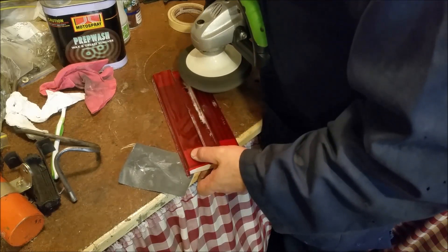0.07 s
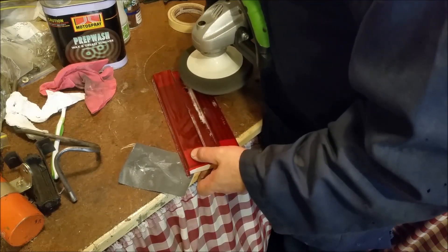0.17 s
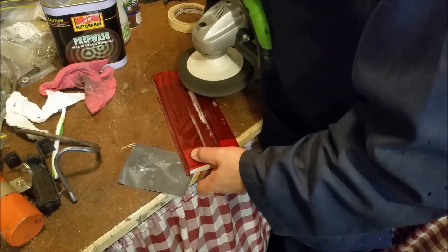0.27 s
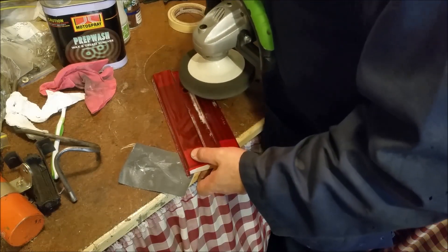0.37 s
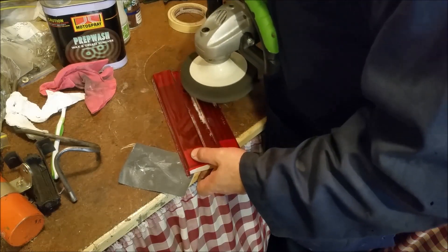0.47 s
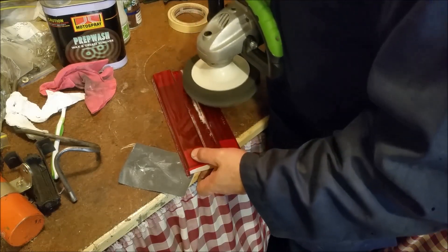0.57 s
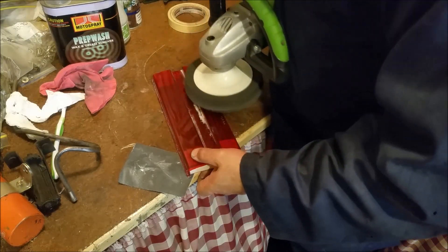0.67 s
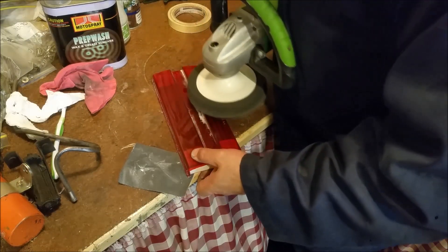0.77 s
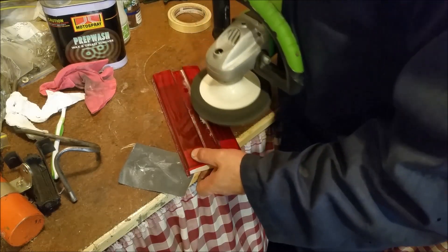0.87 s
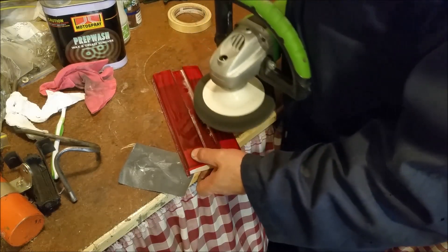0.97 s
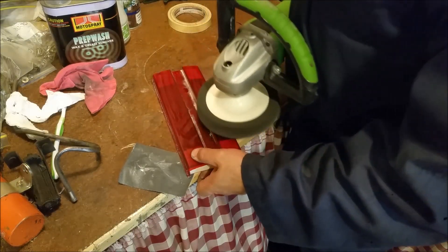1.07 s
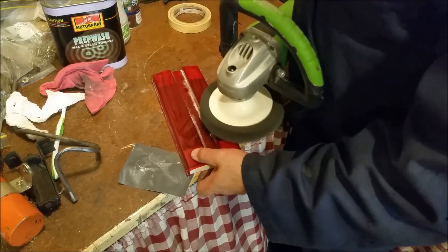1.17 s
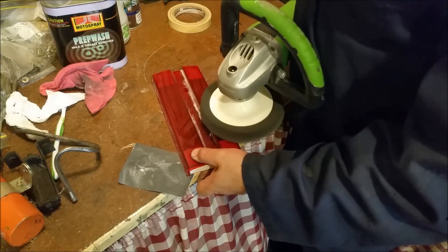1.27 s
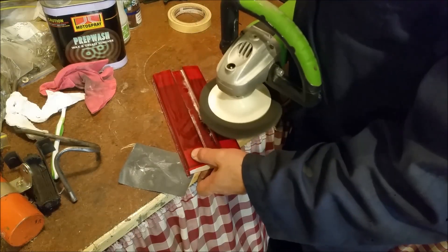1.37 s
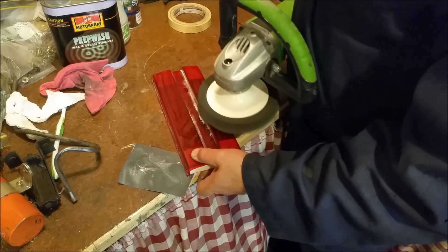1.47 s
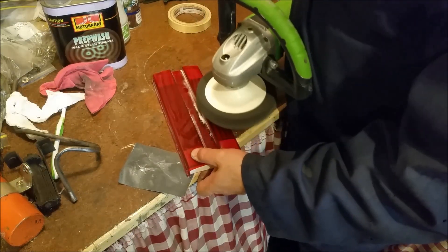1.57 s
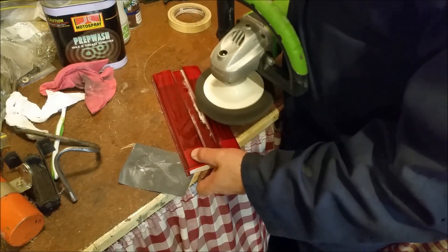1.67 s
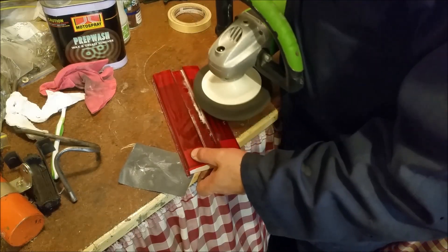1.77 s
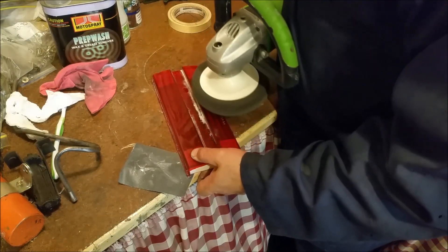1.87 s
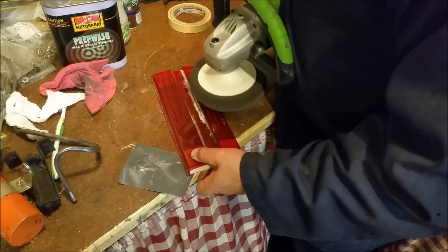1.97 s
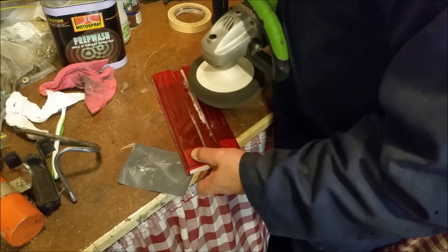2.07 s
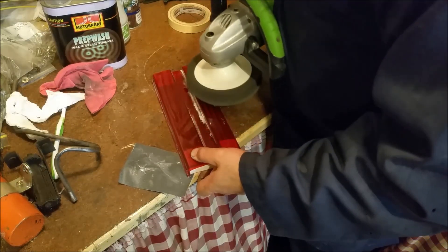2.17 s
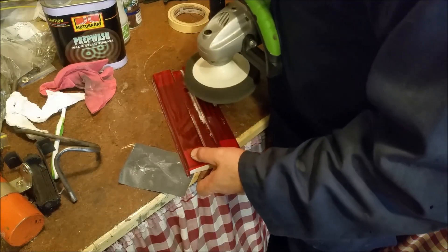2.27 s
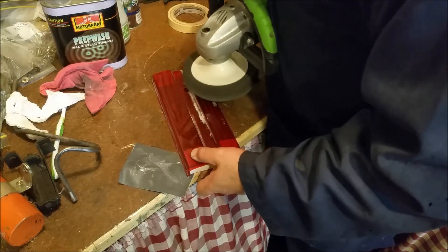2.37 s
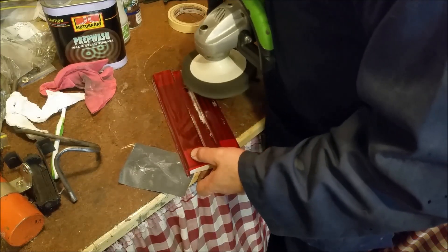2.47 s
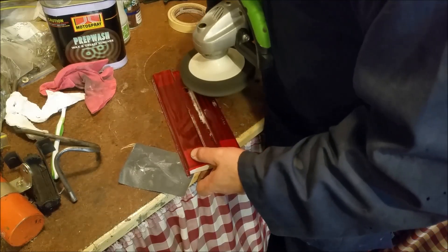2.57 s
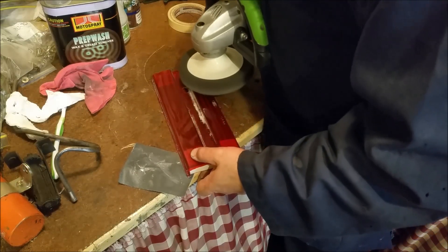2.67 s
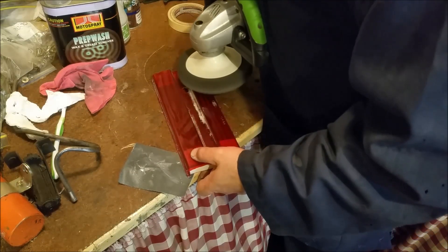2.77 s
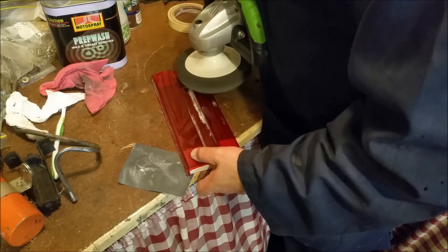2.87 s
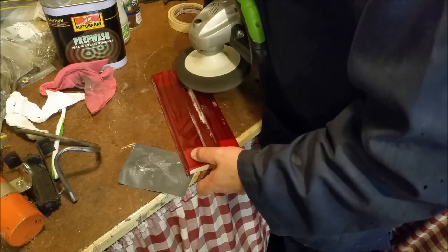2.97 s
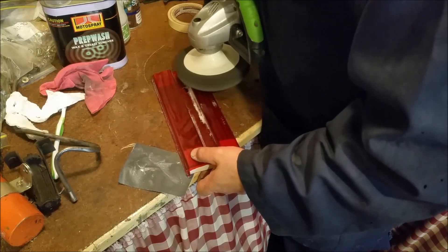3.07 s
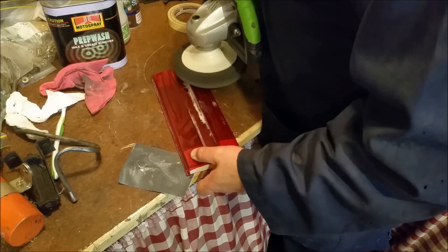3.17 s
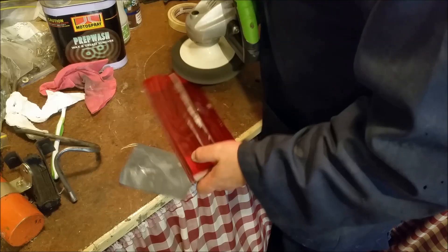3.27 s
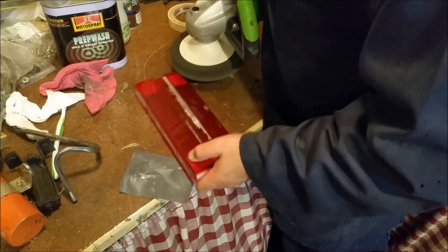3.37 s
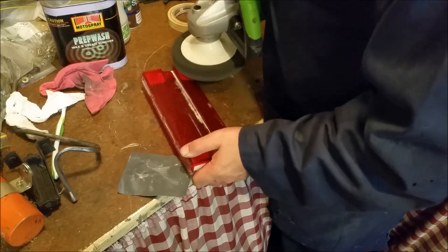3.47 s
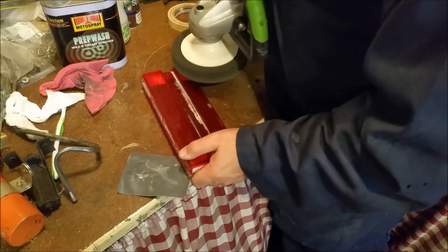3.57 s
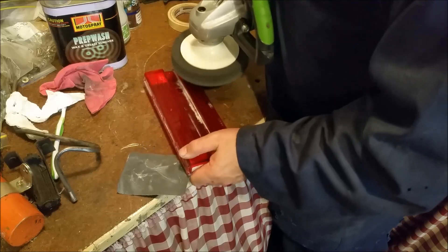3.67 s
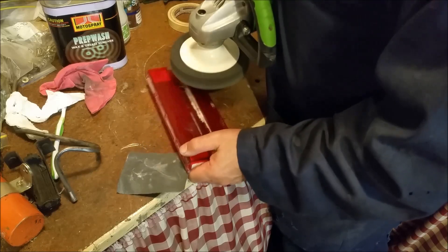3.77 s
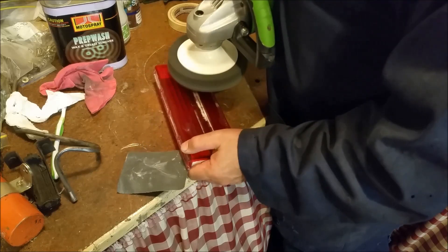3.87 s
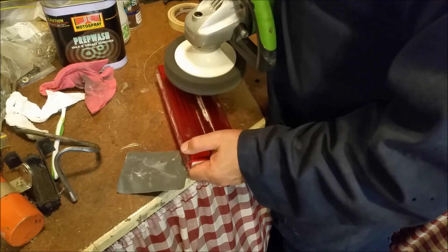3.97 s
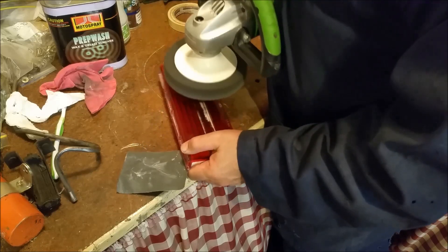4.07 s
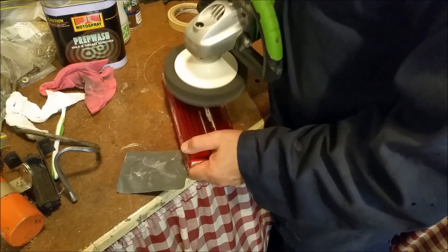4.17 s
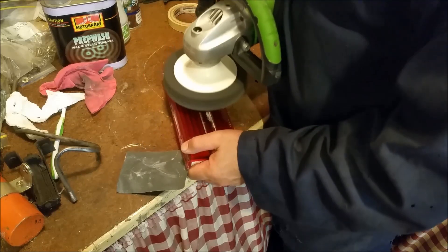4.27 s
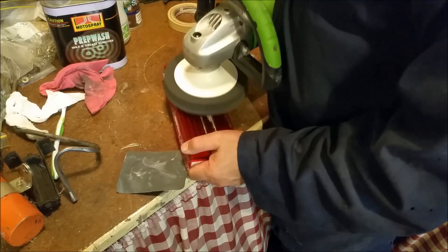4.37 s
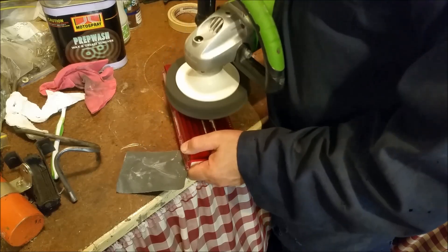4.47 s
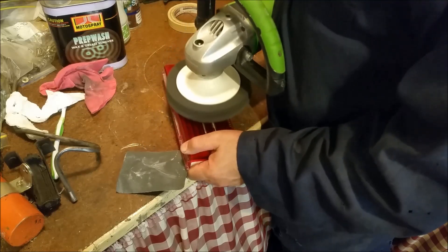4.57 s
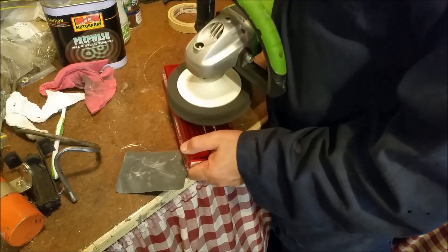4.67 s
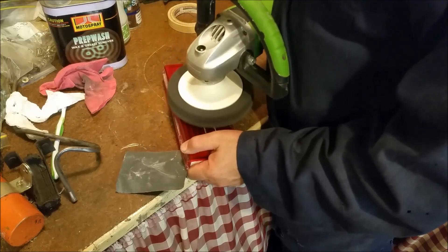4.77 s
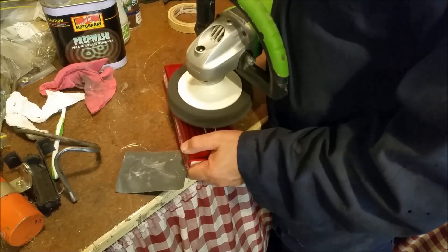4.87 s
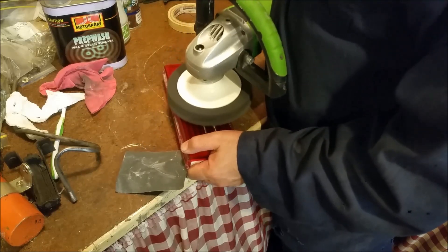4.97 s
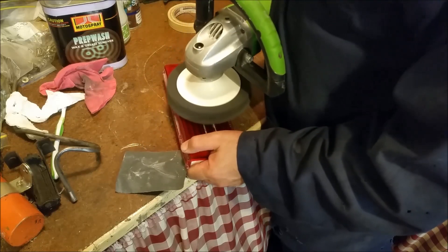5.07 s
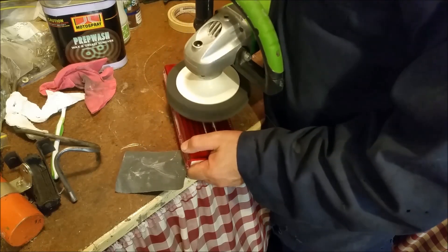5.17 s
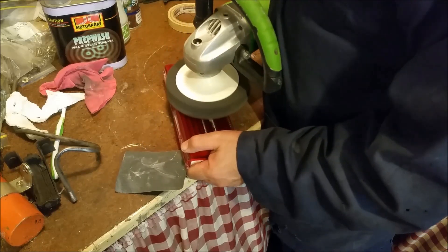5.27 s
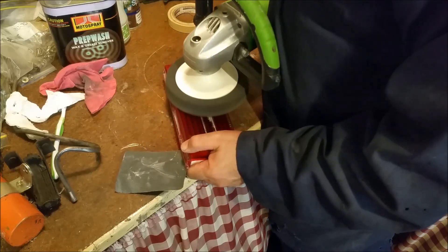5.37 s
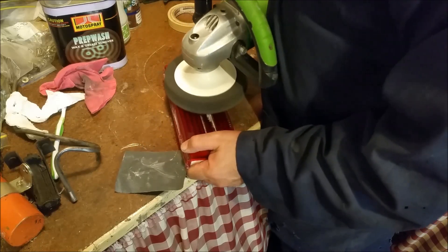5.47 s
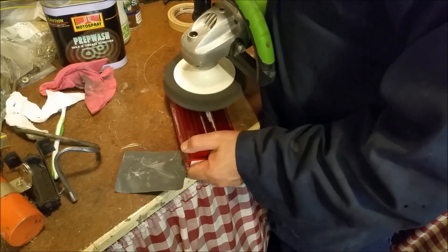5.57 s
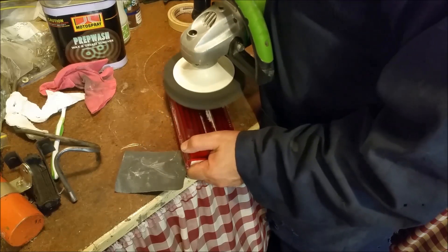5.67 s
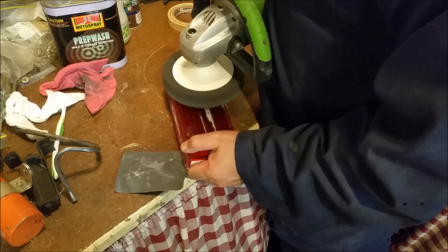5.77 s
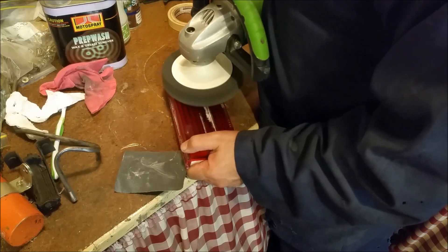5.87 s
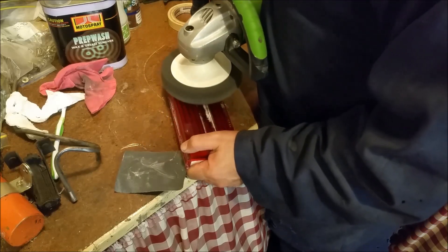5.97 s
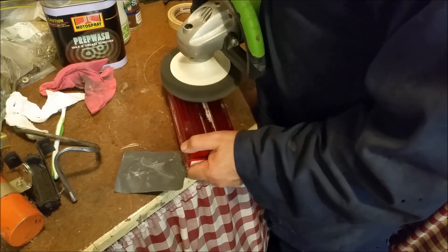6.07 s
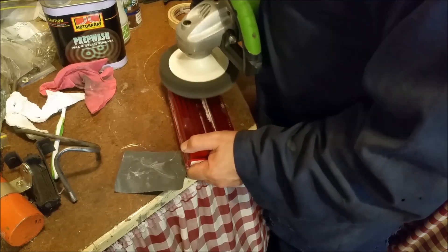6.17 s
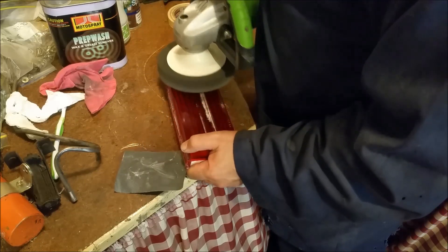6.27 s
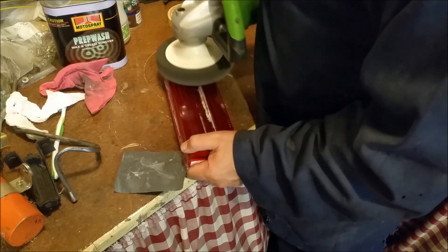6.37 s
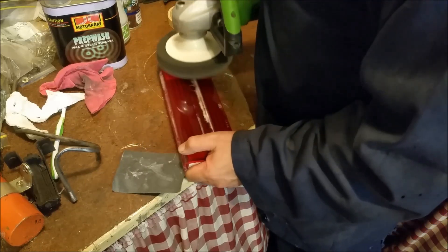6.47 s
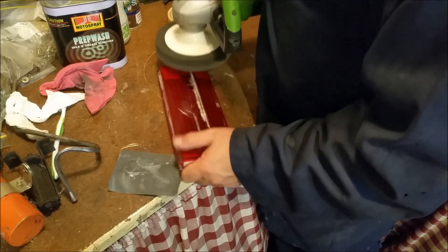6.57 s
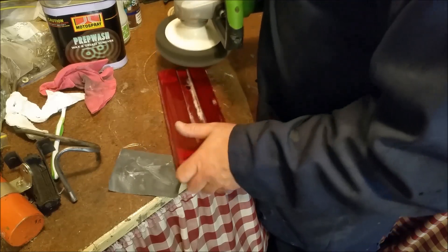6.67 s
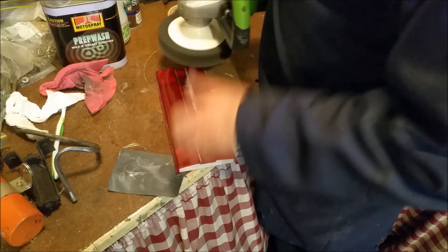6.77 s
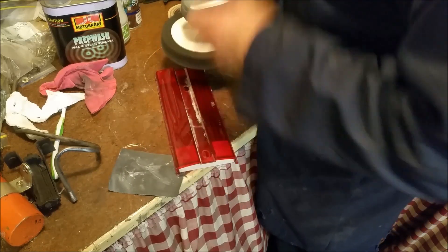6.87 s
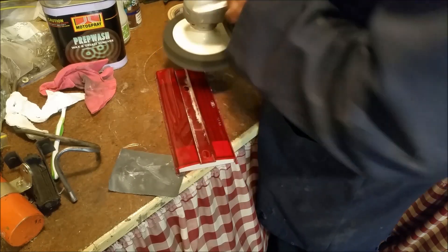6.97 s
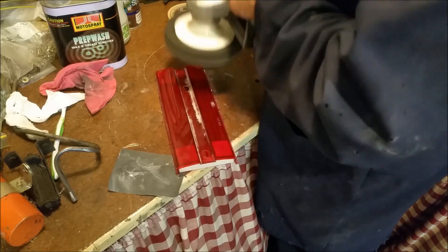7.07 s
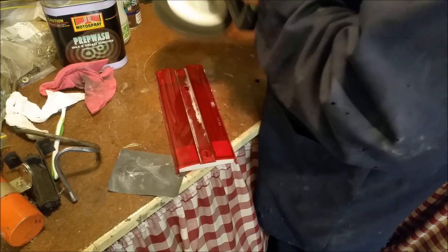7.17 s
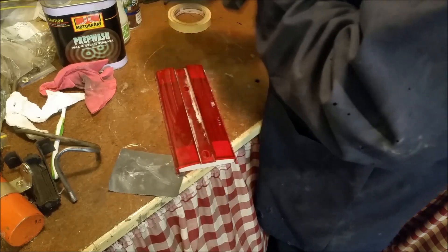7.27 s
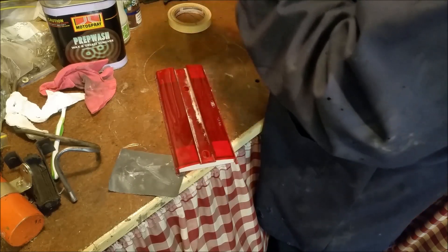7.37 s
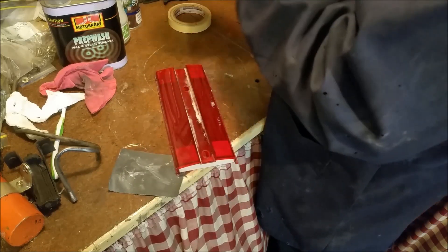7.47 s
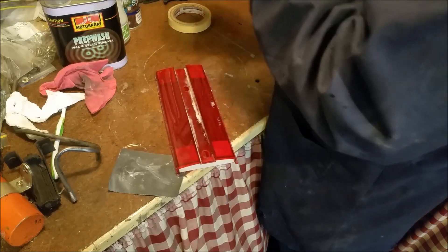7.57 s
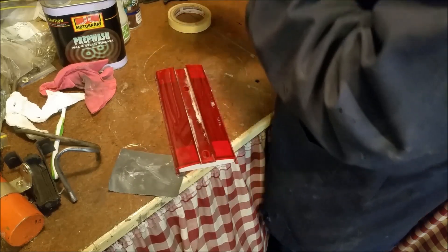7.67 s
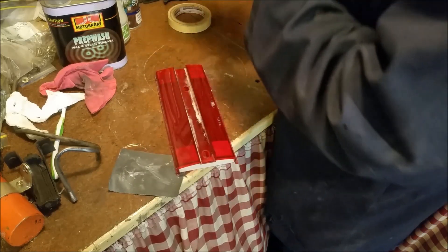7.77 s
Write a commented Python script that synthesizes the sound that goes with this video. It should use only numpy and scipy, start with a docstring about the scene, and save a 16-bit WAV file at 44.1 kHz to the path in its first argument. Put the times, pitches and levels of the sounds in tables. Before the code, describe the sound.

Close, throbbing motor whine with gear grind and pad rubbing, rising when lifted, sagging under load, ending in plastic knocks and a falling spin-down.

```python
"""A hand-held electric polisher presses on a ribbed plastic lens on a garage bench, heard close by in stereo.
From the start the armature slots whine in mains-rate throbs, gears grind, the pad rubs and the fan hisses.
At 3.4 s the pad lifts and the motor speeds up; at 4.45 s it lands again, and it lifts once more at 6.6 s.
From 6.73 s the released lens clatters on the bench; at 6.8 s the power goes off and the tool coasts, its gears ticking.
Tones follow the summed turns of the armature; rubbing, grinding, air and garage are noise shaped by spectra."""
import sys
import numpy as np
from scipy import signal
from scipy.fft import rfft, irfft, next_fast_len
from scipy.io import wavfile
from scipy.ndimage import uniform_filter1d

SR = 44100
rng = np.random.default_rng(int(sys.argv[2]) if len(sys.argv) > 2 else 0)


def wav_out(sig):
    """Save sig, one row per channel (or a flat mono array), as 16-bit PCM at SR to the path in sys.argv[1]."""
    wavfile.write(sys.argv[1], SR, np.round(np.clip(np.atleast_2d(sig).T, -1, 1) * 32767).astype(np.int16))


N = 345303

SLOTS, BARS = 12, 24  # armature slots and commutator bars: cycles per turn
POWER_OFF_S = 6.797
MAINS_HZ, MAINS_PEAK_S = 50, 0.0108


def undb(db):
    """Amplitude factor of a level in dB."""
    return 10 ** (np.asarray(db) / 20)


def shape(points, size):
    """Level in dB on the bins of a transform, interpolated over log frequency between (f/Hz, level/dB) points."""
    hz, db = np.transpose(points)
    bins_hz = np.arange(size // 2 + 1) * SR / size
    return np.interp(np.log(bins_hz + 1), np.log(hz), db)


def colour(x, points):
    """Filter by a spectrum, scaled so that unit white noise keeps rms 1."""
    size = next_fast_len(N)
    gain = undb(shape(points, size))
    gain = gain / np.sqrt(np.mean(gain ** 2))
    return irfft(rfft(x, size) * gain, size)[..., :N]


def ring(x, hz, width_hz):
    """One resonance: a peak filter of the given bandwidth."""
    return signal.lfilter(*signal.iirpeak(hz, hz / width_hz, fs=SR), x)


def ring_twice(x, hz, width_hz):
    """The same resonance passed twice, for steeper skirts."""
    return ring(ring(x, hz, width_hz), hz, width_hz)


def walk(rate):
    """Random levels drawn `rate` times a second and smoothed twice; spread about 0.67."""
    hold = int(SR / rate)
    steps = np.repeat(rng.standard_normal(N // hold + 1), hold)
    return 0.91 * uniform_filter1d(uniform_filter1d(steps, hold), hold)[:N]


def tone(multiple, turns):
    """Sine of rms 1 and random phase, locked to a multiple of the given cycle count."""
    return np.sqrt(2) * np.sin(2 * np.pi * (multiple * turns + rng.random()))


def swells(t, events):
    """Sum of bell-shaped level changes in dB from (centre t/s, spread/s, level/dB) events."""
    return sum(db * np.exp(-.5 * ((t - s) / spread) ** 2) for s, spread, db in events)


def mains_cycles(t):
    """Mains cycles since a peak of the stronger half wave."""
    return MAINS_HZ * (t - MAINS_PEAK_S)


def powered(t):
    """1 while the motor has power, then 0, with a short crossfade."""
    return uniform_filter1d(1. * (t < POWER_OFF_S), SR // 300)


def throb(depth, uneven):
    """The motor current peaks twice a mains cycle, one half stronger, until the switch opens; mean 1."""
    t = np.arange(N) / SR
    mains = 2 * np.pi * mains_cycles(t)
    pull = np.exp(depth * np.cos(2 * mains) + uneven * np.cos(mains))
    return np.where(t < POWER_OFF_S, pull / pull.mean(), 1)


def pressure(t):
    """Pad pressure: each stroke lands smoothly, holds and lifts a little more quickly."""
    # strokes on the lens: lands t/s, leaves t/s, pressure 0-1
    strokes = [(-0.5, 3.42, 0.88), (4.45, 6.6, 0.95)]
    land_s, leave_s = 0.08, 0.048
    total = 0
    for lands, leaves, press in strokes:
        landed = 1 / (1 + np.exp((lands - t) / land_s * 4))
        held = 1 / (1 + np.exp((t - leaves) / leave_s * 4))
        total = total + press * landed * held
    return total


def layer_db(layer, t, hz):
    """Level from load and speed; once the switch opens it drops, then keeps sinking."""
    free_db, load_db, speed_db, off_db, die_s = layer
    coast_db_per_s = -4.5
    off_s = np.maximum(t - POWER_OFF_S, 0)
    running_db = free_db + load_db * pressure(t) + speed_db * np.log2(hz / 200)
    return running_db + off_db * (1 - np.exp(-off_s / die_s)) + coast_db_per_s * off_s


def tone_db(multiple, hz):
    """Case resonances make each tone loud at some speeds and faint at others; it also wavers a little."""
    # speed/turns per s, then the level/dB of each of the multiples below
    case_levels = [(160.4, -35, -33.5, -37, -37, -32.5, -32.5, -32),
                   (161, -39, -31, -35, -37, -29.5, -36, -36.5),
                   (162.7, -35, -29, -30, -35, -29.5, -40, -31),
                   (163.4, -38, -34, -27, -28.5, -31, -51, -33),
                   (165.3, -34.5, -29.5, -30, -29.5, -40, -41, -34.5),
                   (167.3, -36, -33, -33, -30, -45, -43, -32),
                   (168.5, -37, -27, -31.5, -37, -52, -35, -30.5),
                   (170.7, -32, -28, -25.5, -34, -43, -31.5, -29),
                   (171.3, -31, -33, -27, -37.5, -41, -30.5, -27), (178, -36, -36, -42, -45, -48, -43, -27),
                   (186.4, -41, -34, -46, -49, -50, -44, -34),
                   (190.3, -47, -22.5, -33, -37.5, -41, -37, -28.5),
                   (192.6, -46, -25, -40, -39, -38, -45, -30.5),
                   (196.3, -51, -21.5, -37, -33, -44, -46, -29.5),
                   (197.6, -46, -21.5, -33, -40, -39, -41, -34),
                   (199.4, -48, -20, -34, -39, -42, -36, -37.5),
                   (200.8, -42, -20, -37, -36, -36, -42, -29.5), (205.2, -41, -25, -45, -33, -41, -36, -35),
                   (208.4, -32, -26.5, -32, -33, -44, -29, -33), (209, -36, -24.5, -38, -29, -36, -29, -32),
                   (211, -38, -30.5, -41, -28, -39, -26, -36), (213.6, -45, -33, -45, -29, -40, -32, -35.5)]
    # multiples of the turn rate, in the order of those columns
    multiples = (9, 12, 15, 18, 19, 21, 24)
    columns = np.transpose(case_levels)
    return np.interp(hz, columns[0], columns[1 + multiples.index(multiple)]) + 1.1 * walk(6)


def armature_speed(t):
    """Turns per s: set by trigger hand and load, then dying away exponentially without power."""
    # t/s, speed/turns per s
    speed = [(0, 158.9), (0.25, 160.3), (0.5, 163.5), (0.75, 166.9), (1, 169.7), (1.25, 171.3),
             (1.5, 172.1), (1.75, 171.7), (2, 170.4), (2.25, 168.0), (2.5, 165.0), (2.75, 161.9),
             (3, 161.0), (3.2, 161.5), (3.33, 164.1), (3.45, 171.1), (3.6, 181.6), (3.75, 189.8),
             (3.9, 196.7), (4.1, 204.1), (4.3, 209.5), (4.45, 212.4), (4.6, 213.9), (4.75, 213.4),
             (4.95, 210.5), (5.15, 206.4), (5.35, 202.5), (5.6, 198.5), (5.85, 194.6), (6.1, 191.1),
             (6.3, 189.4), (6.45, 190.3), (6.6, 193.6), (6.7, 197.2), (6.8, 199.4)]
    coast_s, coast_lag_s = 2.4, 0.063  # time constant of the speed loss, and its delay
    driven = uniform_filter1d(np.interp(t, *np.transpose(speed)), SR // 20)
    coasting = np.maximum(t - POWER_OFF_S - coast_lag_s, 0)
    return driven, driven * np.exp(-coasting / coast_s)


def slot_whine(turns, slot_db):
    """Slots sing as the current's pull throbs; an out-of-round armature adds the multiple below, which beats."""
    # side tones of the whine: t/s, then level/dB at each of the offsets below
    side_levels = [(0.0, -52, -52, -54, -35, -39, -38), (0.4, -57, -46, -52, -41, -42, -39),
                   (0.8, -51, -54, -42, -41, -39, -39), (1.2, -35, -48, -41, -38, -37, -39),
                   (1.6, -43, -46, -42, -29, -36, -27), (2.0, -51, -50, -47, -43, -34, -32),
                   (2.4, -53, -48, -39, -33, -38, -35), (2.8, -49, -44, -52, -34, -38, -36),
                   (3.2, -54, -47, -53, -36, -36, -41), (3.5, -60, -45, -38, -39, -36, -34),
                   (3.65, -47, -42, -41, -26, -22, -39), (3.8, -57, -43, -45, -21.5, -37, -43),
                   (3.95, -47, -45, -26, -25, -31, -38), (4.1, -48, -35, -20.5, -27, -39, -51),
                   (4.25, -39, -26, -22, -35, -44, -55), (4.4, -38, -28, -23.5, -31, -44, -48),
                   (4.55, -35, -25, -32, -33, -46, -45), (4.7, -39, -22.5, -37, -40, -43, -50),
                   (4.85, -39, -27, -35, -36, -49, -48), (5.0, -40, -29, -28, -36, -42, -48),
                   (5.15, -47, -26, -24, -36, -41, -49), (5.3, -48, -32, -29, -36, -43, -41),
                   (5.5, -48, -30, -26, -32, -26, -48), (5.7, -55, -40, -28, -25, -37, -37),
                   (5.9, -45, -47, -38, -21, -29, -39), (6.1, -49, -39, -44, -27.5, -33, -35),
                   (6.3, -52, -37, -42, -27, -33, -41), (6.5, -46, -29, -32, -25, -38, -46),
                   (6.7, -50, -40, -35, -27, -40.5, -51)]
    # offsets from the whine, in current peaks (two per mains cycle)
    offsets = (-3, -2, -1, 1, 2, 3)
    uneven, below_db, lag = 0.29, -11, 0.11  # one mains half stronger; side tone lag in cycles per offset
    t = np.arange(N) / SR
    mains, power, start = mains_cycles(t), powered(t), rng.random()
    columns = np.transpose(side_levels)

    def side_tone(offset):
        phase = SLOTS * turns + start + 2 * offset * mains - lag * abs(offset)
        return np.sqrt(2) * np.sin(2 * np.pi * phase)

    sides = 0
    for offset, db in zip(offsets, columns[1:]):
        sides = sides + undb(np.interp(t, columns[0], db) + 2.0 * walk(9)) * side_tone(offset)
    # the multiple below follows the level of the side tone two peaks below
    sides += undb(np.interp(t, columns[0], columns[2]) + below_db) * tone(SLOTS - 1, turns)
    pulse = 1 + uneven * power * np.cos(2 * np.pi * mains)
    return undb(slot_db) * side_tone(0) * pulse + power * sides


def winding_hum():
    """The current hums in the windings at even multiples of the mains while there is power."""
    # multiple of the mains, level/dB
    hum_tones = [(4, -66), (6, -59), (8, -55), (10, -56)]
    t = np.arange(N) / SR
    hum = sum(undb(db + 3.1 * walk(2.5)) * tone(k, mains_cycles(t)) for k, db in hum_tones)
    return powered(t) * hum


def rotor(turns, hz, bars_db, free):
    """Brushes cross the commutator bars; imbalance shakes with speed squared, its overtones also with load."""
    # shake of the housing: multiple of the turn rate, level/dB at 200 turns per s under power and load
    shakes = [(1, -58), (2, -55), (3, -49.5), (4, -48.5)]
    coast_db, free_db = -6.5, -8  # change without power; change of the overtones with the pad off
    force = undb(coast_db * (np.arange(N) > POWER_OFF_S * SR)) * (hz / 200) ** 2
    shake = 0
    for k, db in shakes:
        overtone_db = free_db * free + 4.0 * walk(3.0) if k > 1 else 0
        shake = shake + undb(db + overtone_db) * tone(k, turns)
    return undb(bars_db) * tone(BARS, turns) + force * shake


def gear_mesh(turns, hz, mesh_db, free):
    """Meshing gear teeth sound at fixed multiples of the turn rate, weaker when the pad runs free."""
    # multiples of the turn rate
    mesh_multiples = (9, 15, 18, 19, 21)
    # level change/dB of each multiple with the pad off
    free_levels = [-5, -13, -17, -13, -17]
    return sum(undb(mesh_db + free_db * free + tone_db(k, hz)) * tone(k, turns)
               for k, free_db in zip(mesh_multiples, free_levels))


def gear_grind(turns):
    """Grinding noise plus the pattern that repeats each turn, each tone wavering alone, through the housing."""
    # weaker tones: multiple of the turn rate, level/dB over the grinding noise in 1 Hz
    teeth = [(6, 24), (7, 15), (11, 21), (13, 22.5), (14, 18.5), (16, 18.5), (10, 14), (17, 13), (20, 21.5),
             (22, 14), (23, 18.5), (25, 22.5), (26, 14), (27, 22), (28, 24.5), (29, 23.5), (30, 22),
             (31, 26), (32, 25.5), (33, 7), (34, 14), (36, 16)]
    # housing spectrum: f/Hz, relative level/dB
    housing = [(400, -34.5), (1200, -11.5), (1600, -13), (2050, -6), (2340, 0.5), (2600, -2.5),
               (3050, -6.5), (3370, -10.5), (3900, -9), (4610, -4), (5100, -12), (5850, -24), (8000, -23),
               (10400, -56)]
    lines = sum(undb(db + 3.0 * walk(3.08)) * tone(k, turns) for k, db in teeth)
    grind = undb(0.85 * walk(13)) * throb(0.14, 0.18) * rng.standard_normal(N)
    return colour(grind + lines * np.sqrt(2 / SR), housing)  # the factor refers tones to noise in 1 Hz


def pad_rub(t, pad_db):
    """Low shaped noise of the pad throbs with the current and swells briefly, also as the lens rattles."""
    # brief swells of low noise (pad scuffs; at 6.865 s the lens rattling on the bench):
    # centre t/s, spread/s, level/dB
    low_swells = [(1.003, 0.076, 1), (2.291, 0.031, 0.5), (3.37, 0.12, 3), (6.412, 0.14, 1.5),
                  (6.865, 0.018, 5)]
    # rubbing spectrum: f/Hz, relative level/dB
    pad_spectrum = [(53, -52.5), (90, -29), (175, -15.5), (248, -21.5), (415, -4), (547, -7), (703, -4),
                    (915, -5), (1010, -1), (1270, -4), (1450, 0.5), (1800, -4), (2340, -9), (3960, -120)]
    rub = colour(throb(0.18, 0.083) * rng.standard_normal(N), pad_spectrum)
    return undb(pad_db + swells(t, low_swells) + 1.0 * walk(8)) * rub


def fan(turns):
    """Gusty air, unrelated left and right, with turn-rate multiples that flare at cowl and vent resonances."""
    # multiples that stand out: multiple of the turn rate, level/dB over the air in 1 Hz
    overtones = [(36, 17), (42, 13), (45, 15), (54, 8), (60, 14), (62, 13)]
    # air spectrum: f/Hz, relative level/dB
    air_spectrum = [(1650, -36), (2800, -13), (3500, -4.5), (3860, -0.5), (4210, -3.5), (4550, -3.5),
                    (4860, -3.5), (5980, -18.5), (6560, -13.5), (7570, -22.5), (8550, -15), (11100, -15),
                    (15500, -25)]
    cowl_hz, cowl_width_hz, vent_hz, vent_width_hz = 8900, 1300, 6700, 480
    air = undb(1.1 * walk(4.28) + 2.24 * walk(9)) * rng.standard_normal((2, N))
    lines = sum(undb(11 + 6.0 * walk(6)) * tone(k, turns) for k in range(32, 68))
    lines += sum(undb(db + 6.0 * walk(6.4)) * tone(k, turns) for k, db in overtones)
    # the overtone of the commutator crosses the cowl resonance, lower multiples that of the vent
    lines += ring(undb(22 + 5.0 * walk(10)) * tone(2 * BARS, turns), cowl_hz, cowl_width_hz)
    vent = sum(undb(25 + 3.5 * walk(4)) * tone(k, turns) for k in (30, 31, 32, 33))
    lines += ring_twice(vent, vent_hz, vent_width_hz)
    lines *= undb(1.0 * (np.arange(N) > POWER_OFF_S * SR))  # 1 dB clearer while coasting
    return colour(air + lines * np.sqrt(2 / SR), air_spectrum)


def garage_air():
    """Steady background noise of the garage, mostly common to both channels."""
    # background spectrum: f/Hz, relative level/dB
    garage_spectrum = [(12, -47), (20, -8.5), (92, -37), (141, -13), (216, -42.5), (300, -17), (574, -9),
                       (730, 5), (1200, -4.5), (1560, -27), (2640, -120)]
    mid, side = rng.standard_normal((2, N))
    return undb(-47.5) * colour(mid + 0.25 * side * np.array([[1], [-1]]), garage_spectrum)


def lens_clatter():
    """Each knock is a short rough scrape into the lens modes, strongest near its range; the thin part lacks bass."""
    # knocks on the bench: t/s, level/dB, loudest range f/Hz, scrape length/ms (two decay time constants)
    knocks = [(6.733, -5.5, 1140, 3.3), (6.766, -7, 1030, 2.4), (6.775, -17, 4000, 4),
              (6.79, -14, 1300, 2.4), (6.8093, -11, 1200, 3.2), (6.8112, -0.5, 1400, 5.5),
              (6.8194, -11, 1800, 3), (6.821, -13, 380, 5), (6.849, -10, 875, 4.7), (6.857, -6, 1000, 7.9),
              (6.866, -7.5, 1410, 5.3), (6.871, -17.5, 1800, 2.5), (6.887, -11.5, 1200, 4.8),
              (6.913, -24, 800, 3)]
    # lens modes: f/Hz, level/dB, t60/s
    lens_modes = [(318, -5, 0.1), (422, -4.5, 0.06), (550, -16, 0.035), (686, -17, 0.028),
                  (880, -2.5, 0.045), (1070, -7, 0.0246), (1210, -4, 0.029), (1303, 6, 0.02),
                  (1460, -7, 0.016), (1758, 4, 0.034), (2000, -1, 0.023), (2400, -13, 0.033),
                  (3550, -2, 0.023), (4500, -12, 0.018)]
    fall_db, crack_db = -14, -4  # mode level per octave away from the range; crack against the modes
    rise_ms, strike = 0.46, 1.8  # onset of the scrape; amplitude of its first sample
    out, t = np.zeros(N), np.arange(SR // 5) / SR
    for s, db, range_hz, scrape_ms in knocks:
        modes = 0
        for hz, mode_db, t60 in lens_modes:
            decay_db = mode_db + fall_db * abs(np.log2(hz / range_hz)) - 60 * t / t60
            modes = modes + undb(decay_db) * np.sin(2 * np.pi * hz * t)
        envelope = np.exp(-2000 * t / scrape_ms) * (1 - np.exp(-1000 * t / rise_ms))
        scrape = rng.standard_normal(len(t)) * envelope
        scrape[0] = strike
        hit = signal.fftconvolve(scrape, modes)[:len(t)]
        hit = hit / np.abs(hit).max() + undb(crack_db) * ring_twice(scrape, 3400, 1700)
        i = int(s * SR)
        out[i:i + len(t)] += undb(db) * hit
    return signal.lfilter(*signal.butter(3, 480, "high", fs=SR), out)


def gear_ticks():
    """Slack gears tick while coasting: short decaying noise bursts in the upper housing resonance."""
    # t/s, level/dB
    tick_times = [(6.8535, -26), (6.894, -22), (6.94, -27), (7.179, -35), (7.2577, -29), (7.3004, -26),
                  (7.7349, -32)]
    tick_hz, width_hz, decay_ms = 4700, 800, 3.4
    length = 1000  # samples per tick
    out, t = np.zeros(N + length), np.arange(length) / SR
    for s, db in tick_times:
        noise = rng.standard_normal(length) * np.exp(-1000 * t / decay_ms)
        burst = ring_twice(noise, tick_hz, width_hz)
        i = int(s * SR)
        out[i:i + length] += undb(db) * burst / np.abs(burst).max()
    return out[:N]


def room(x, tones):
    """Direct sound plus short bass-poor echoes as the tool wanders; side echoes reach the channels in opposite sense."""
    places, t60_s = 12, 0.12
    side_db, front_db = -1.5, -8.5  # echo energy before the bass cut
    t = np.arange(SR // 10) / SR
    tails = rng.standard_normal((places, 2, len(t))) * undb(-60 * t / t60_s)
    tails *= undb([[side_db], [front_db]]) / np.sqrt(np.sum(tails ** 2, axis=2, keepdims=True))
    tails = signal.lfilter(*signal.butter(1, 800, "high", fs=SR), tails)
    place = np.linspace(0, places - 1, N)
    sent = np.array([x + tones, x])  # the tones get side echoes but no front echo
    echoes = np.zeros((2, N))
    for k in range(places):
        near_place = np.cos(np.pi / 2 * np.clip(place - k, -1, 1))
        echoes += signal.oaconvolve(sent * near_place, tails[k], axes=1)[:, :N]
    side, front = echoes
    return undb(-1.5) * (x + tones + front + side * np.array([[1], [-1]]))


def scene():
    """Drive every layer from one armature speed and pad pressure, then mix."""
    # layers: free level/dB at 200 turns per s before trims, change/dB at full pressure, dB per octave of speed,
    # change/dB without power, time constant/s of that change; tone layers add to the case levels
    whine_layer = (2, -2.3, -0.5, -29, 0.004)
    brush_layer = (-3.5, 4.2, 1, -3.2, 0.1)
    mesh_layer = (0.1, 0.3, 0.2, -7, 0.27)
    grind_layer = (-28.5, 5, 3.5, -13.5, 0.2)
    rub_layer = (-31.5, 2.5, 6.5, -10, 0.26)
    air_layer = (-35, 0, 11, -4.5, 0.03)
    # gear and commutator tones dim for a moment: centre t/s, spread/s, level/dB
    dims = [(1.85, 0.087, -2), (3.03, 0.13, -1.5), (3.305, 0.07, -5), (6.723, 0.07, -10),
            (7.055, 0.015, -9), (7.21, 0.015, -4)]
    back_s, back_spread_s, back_db = 6.908, 0.017, 20.5  # the whine returns briefly after the switch opens

    t = np.arange(N) / SR
    driven, hz = armature_speed(t)
    turns = np.cumsum(hz) / SR
    free = np.clip(1 - pressure(t) / 0.85, 0, 1)
    dim_db = swells(t, dims)
    flutter_db = 3 * (t > back_s + 2 * back_spread_s)  # whine and commutator flutter while coasting

    slot_db = layer_db(whine_layer, t, hz) + tone_db(SLOTS, driven)
    slot_db += swells(t, [(back_s, back_spread_s, back_db)]) + 2 * flutter_db * walk(13)
    bars_db = layer_db(brush_layer, t, hz) + tone_db(BARS, hz) + dim_db
    bars_db += 2.2 * walk(13) + flutter_db * walk(24)
    mesh_db = layer_db(mesh_layer, t, hz) + dim_db

    tones = slot_whine(turns, slot_db) + rotor(turns, hz, bars_db, free)
    tones += gear_mesh(turns, hz, mesh_db, free)
    near = winding_hum() + undb(layer_db(grind_layer, t, hz)) * gear_grind(turns)
    near += pad_rub(t, layer_db(rub_layer, t, hz))
    near += lens_clatter() + gear_ticks()
    air = undb(layer_db(air_layer, t, hz) + 5.5) * fan(turns)
    return room(near, tones) + air + garage_air()


def record(dry):
    """The channels differ in sensitivity over frequency, and a steep low-pass cuts the top."""
    # f/Hz, left minus right level/dB
    balance = [(60, 5.5), (110, 5), (200, 3), (380, 2), (700, 1.5), (1290, 5), (2380, 4.5), (4400, 7.5),
               (8120, -4), (15000, 2)]
    size = next_fast_len(N)
    half_db = shape(balance, size) / 2
    wet = irfft(rfft(dry, size) * undb([half_db, -half_db]), size)[:, :N]
    return signal.sosfilt(signal.ellip(10, .2, 80, 15640, fs=SR, output="sos"), wet)


dry = scene()
out = record(dry)
wav_out(out)
```